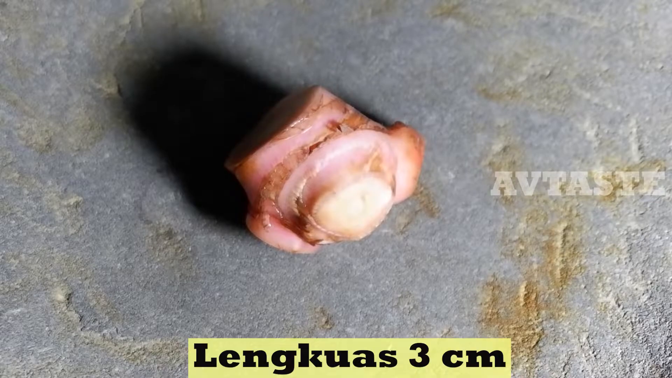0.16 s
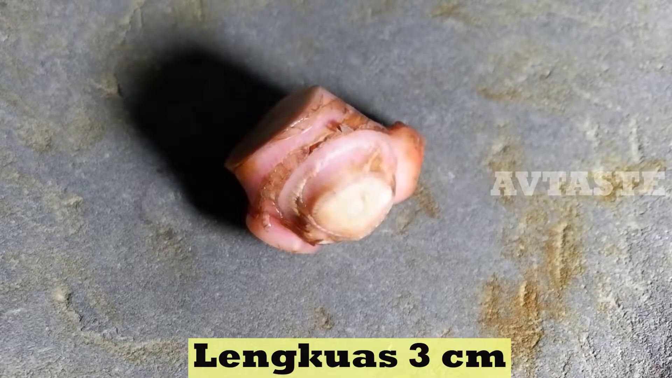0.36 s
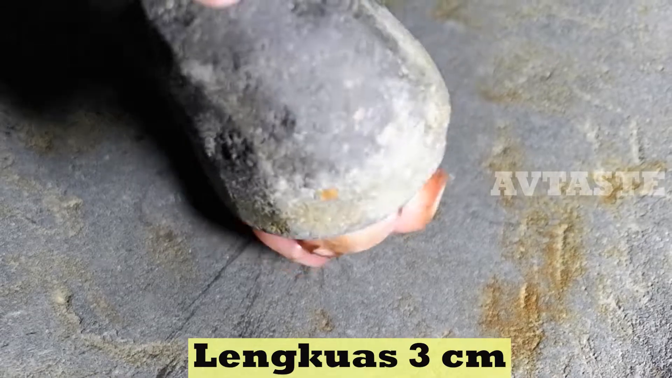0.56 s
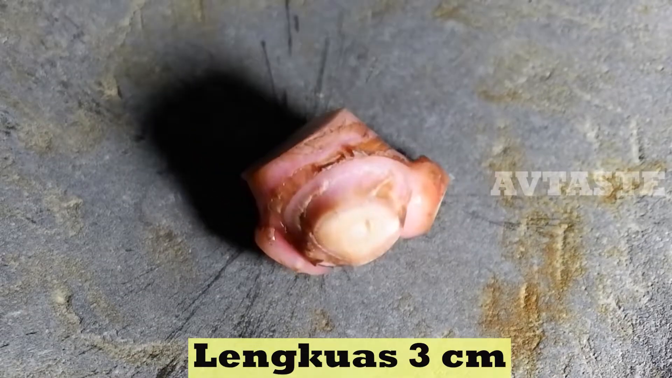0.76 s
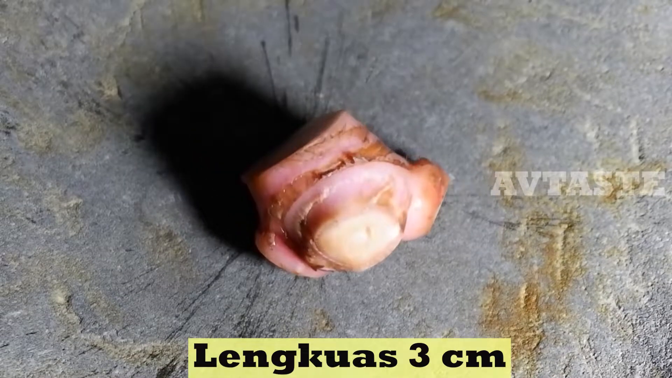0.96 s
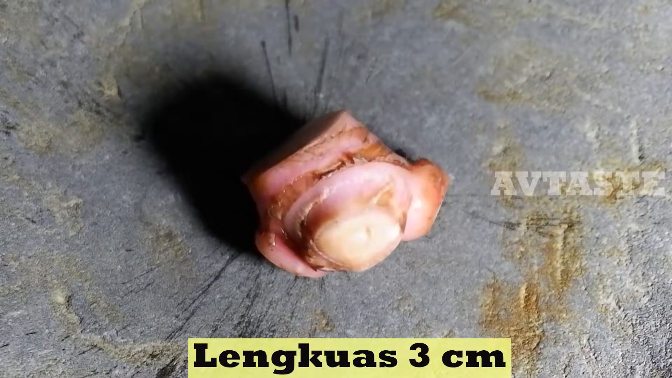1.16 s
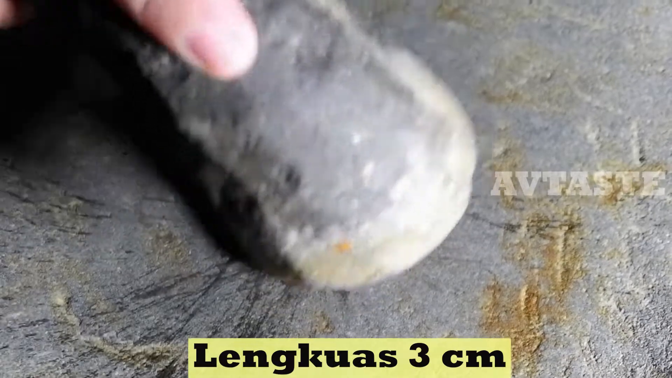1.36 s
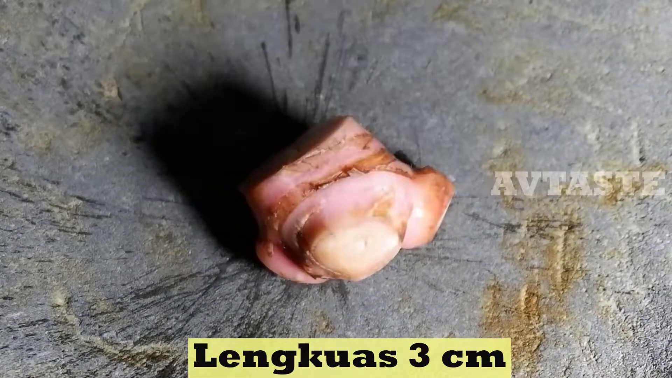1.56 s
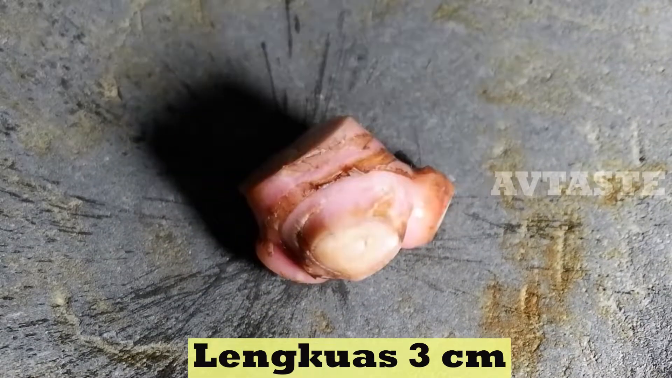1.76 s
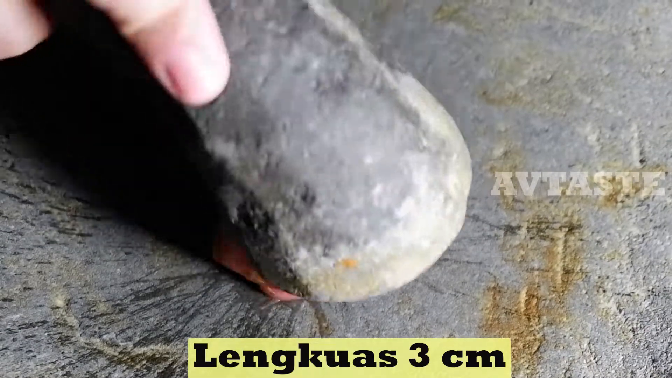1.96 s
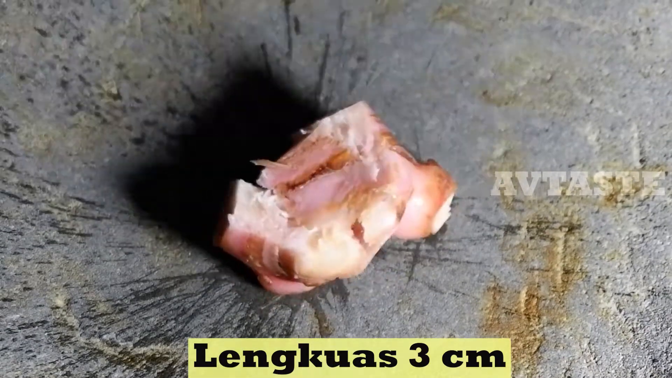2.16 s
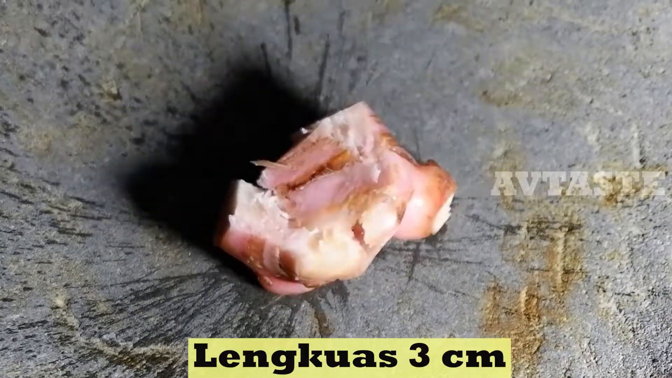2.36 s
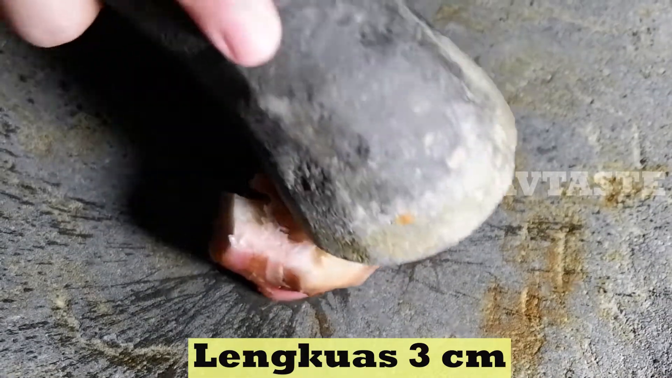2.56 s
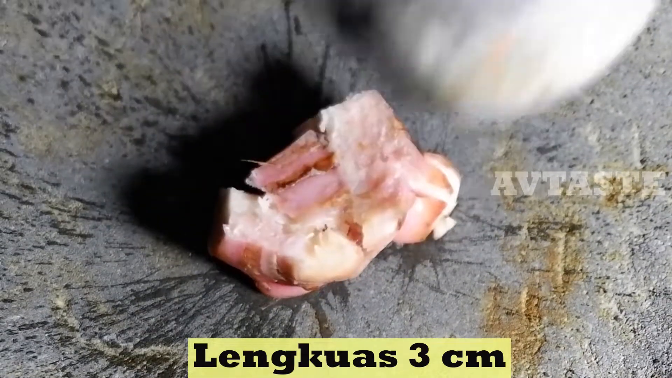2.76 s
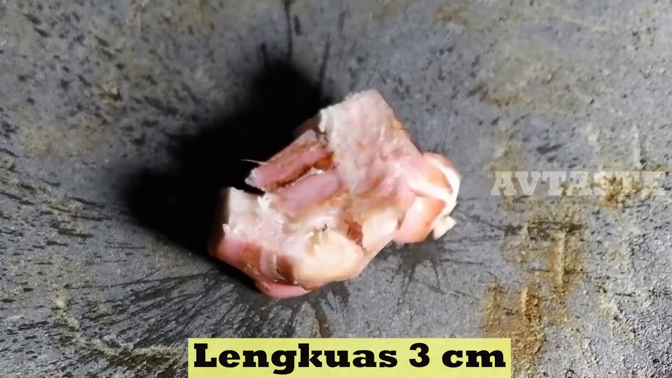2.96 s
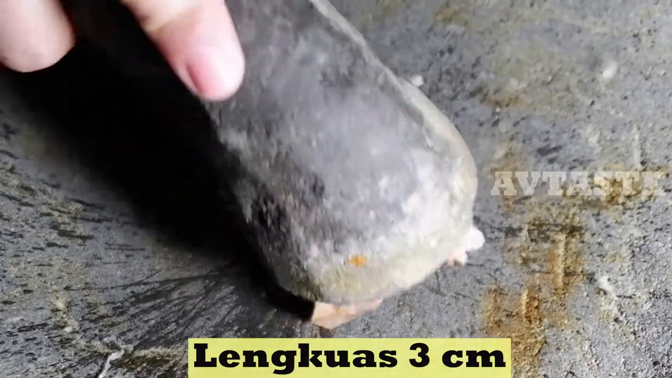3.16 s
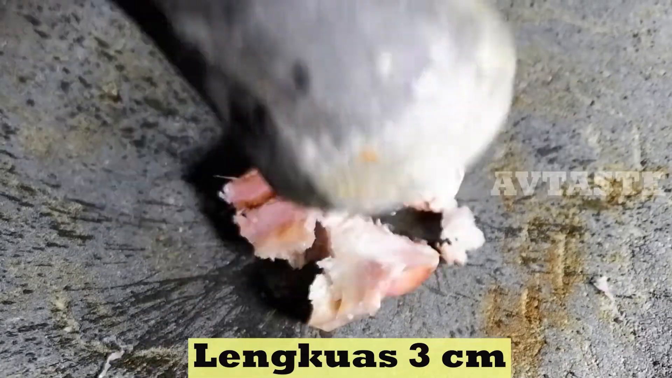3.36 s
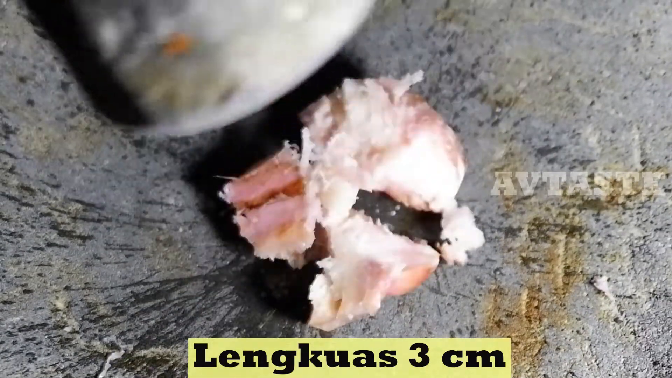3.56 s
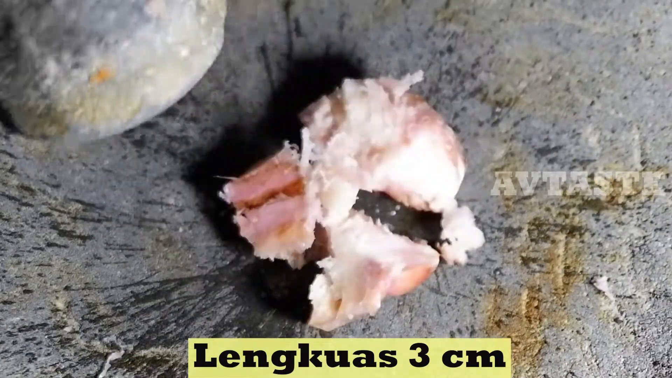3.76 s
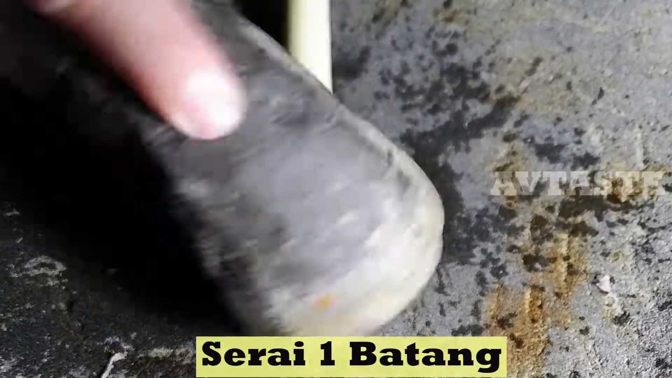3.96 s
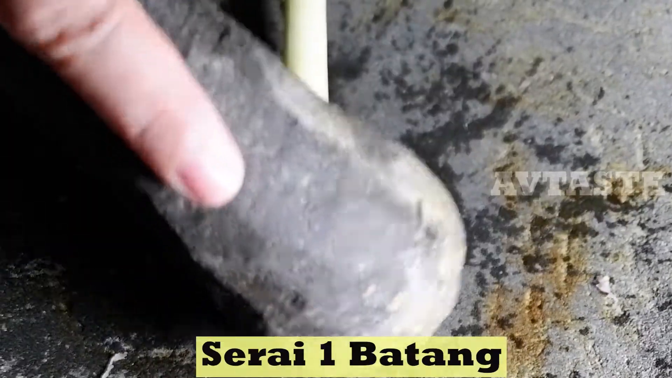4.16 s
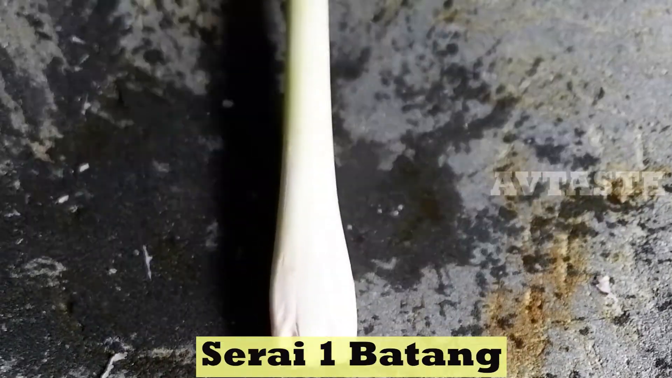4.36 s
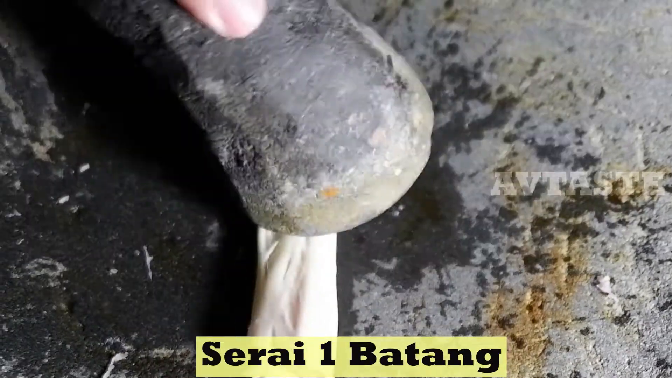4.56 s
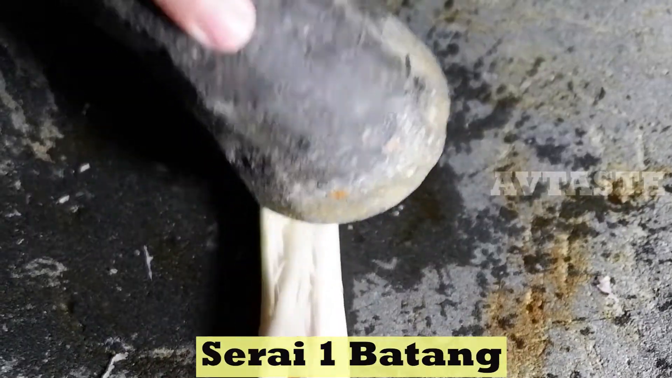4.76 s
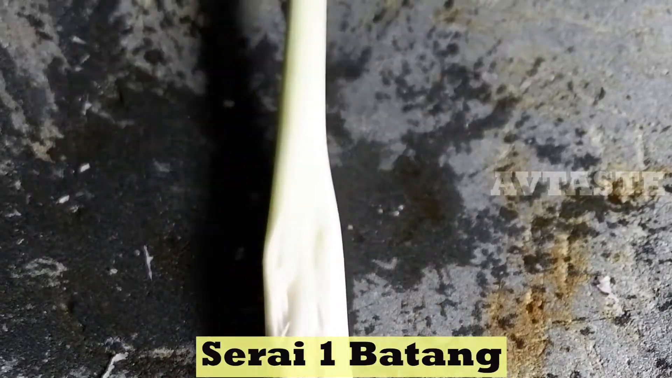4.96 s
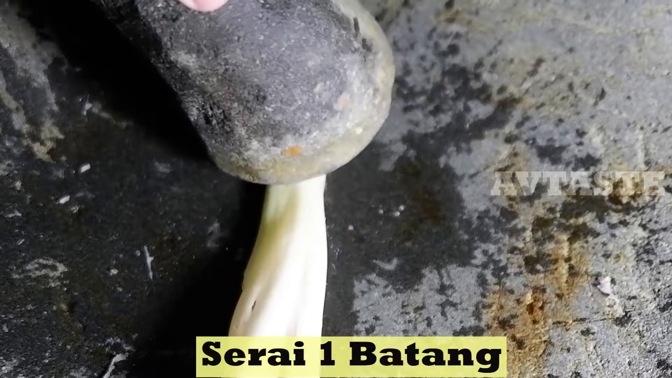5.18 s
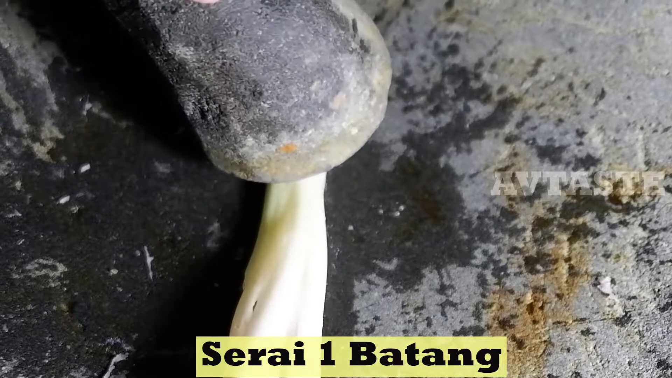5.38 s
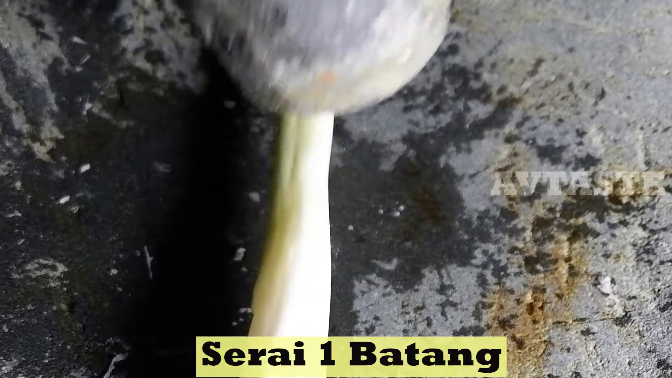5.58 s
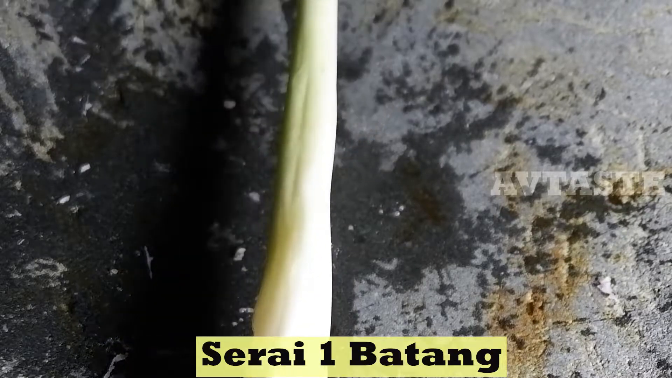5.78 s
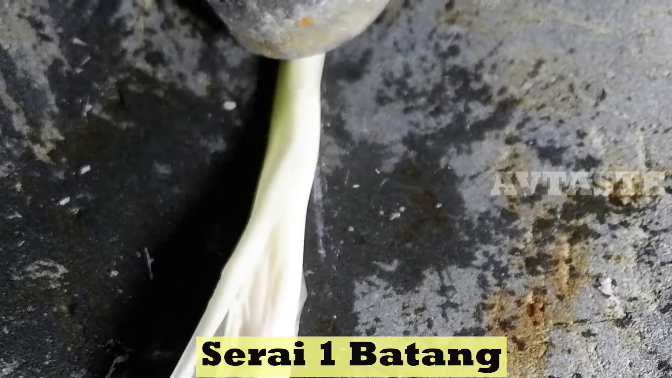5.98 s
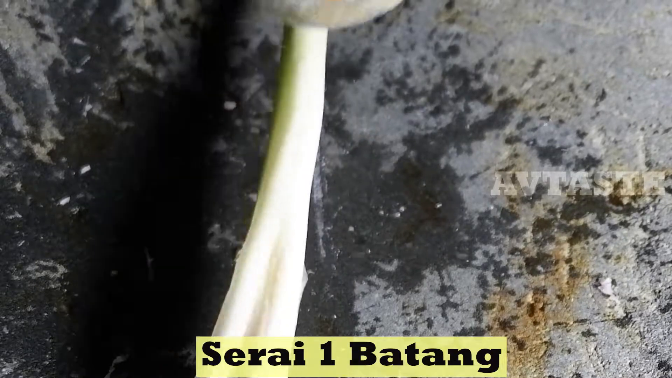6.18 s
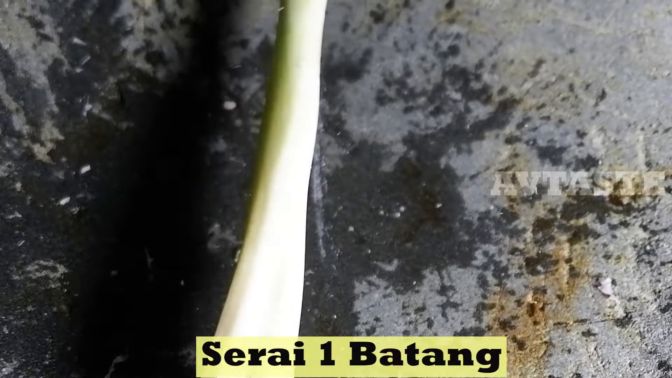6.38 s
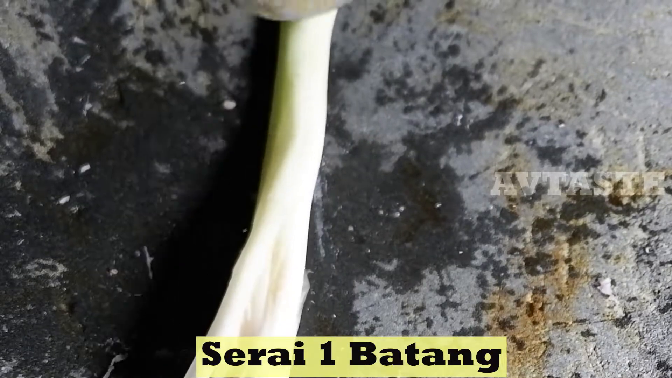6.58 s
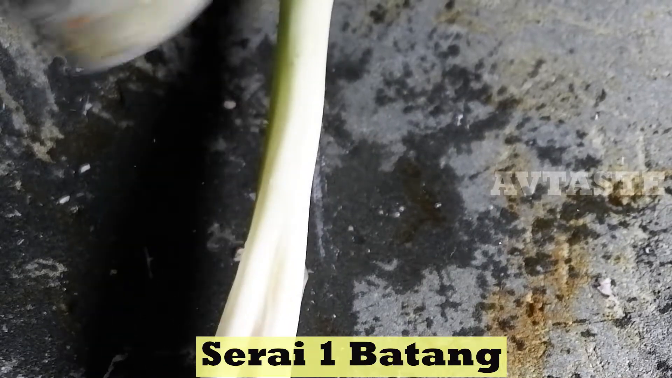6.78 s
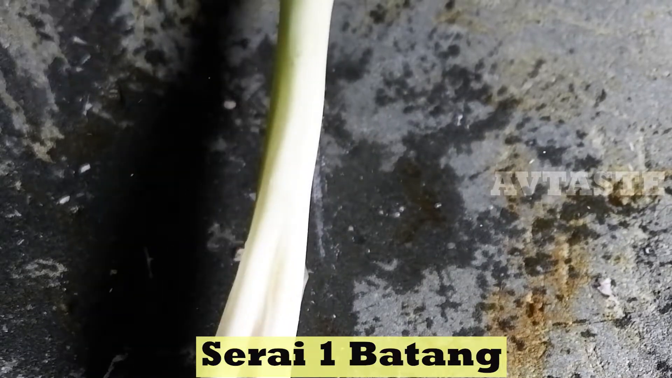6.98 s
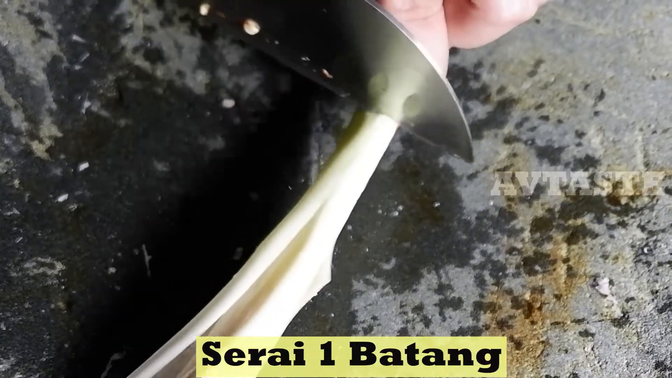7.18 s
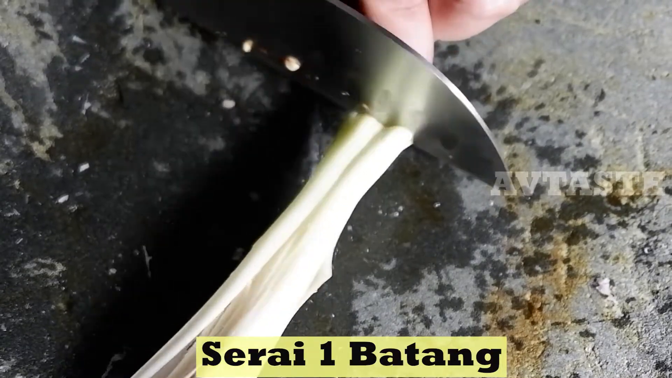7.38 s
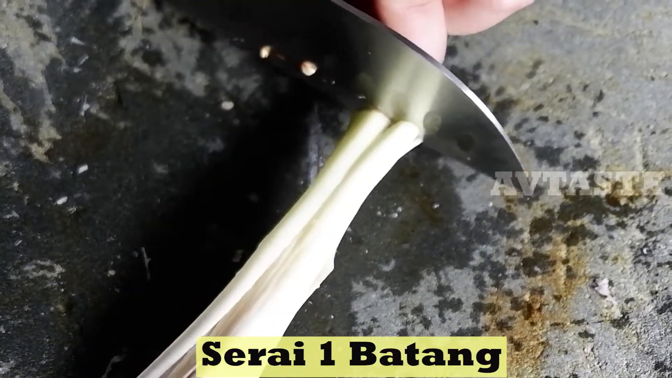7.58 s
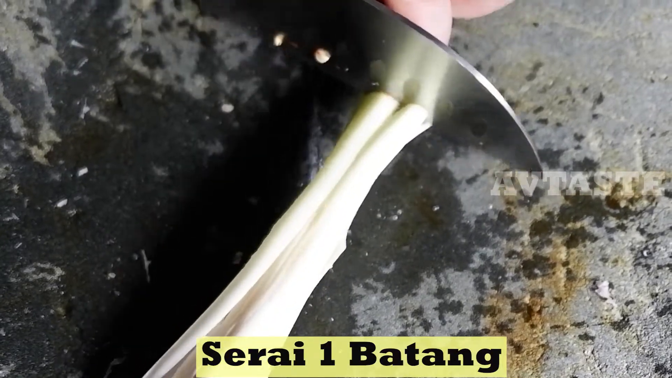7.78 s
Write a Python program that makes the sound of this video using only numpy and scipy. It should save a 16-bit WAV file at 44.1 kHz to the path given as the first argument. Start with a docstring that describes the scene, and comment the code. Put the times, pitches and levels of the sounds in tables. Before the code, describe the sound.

A heavy stone pestle smashes a fibrous root and then a stalk on a stone slab, booming in a hard kitchen, before crunchy knife slicing.

```python
"""A hard-walled kitchen: a stone pestle crushes a knob of galangal, then a lemongrass stalk, on a stone slab.
Each blow is a burst of splitting fibres (shaped noise), a deep thump (force pulse) that makes the room boom,
and knocks as the slab hops and settles (damped tones with grit).
The pounding then cuts to a knife slicing the stalk: crunching noise with single snaps.
Loud sound overloads the close microphone and ducks its limiter."""
import sys
import numpy as np
from scipy import signal
from scipy.fft import rfft, irfft
from scipy.io import wavfile
from scipy.ndimage import uniform_filter1d

SR = 44100
rng = np.random.default_rng(int(sys.argv[2]) if len(sys.argv) > 2 else 0)


def waveform_to_disk(signal):
    """Save audio, clipped to [-1, 1], as 16-bit WAV at the path in sys.argv[1]."""
    frames = np.transpose(np.atleast_2d(signal))
    scaled = np.clip(frames, -1, 1) * 32767
    samples = np.round(scaled).astype(np.int16)
    wavfile.write(sys.argv[1], SR, samples)


N = 345303

# pestle bottoming out; levels relative: (time [s], thump [dB], contact half-width [s], knock [dB],
# first hop of the slab [s], first landing [dB])
BLOWS = [(0.5547, 7.5, 0.00098, 1, 0.031, 7), (1.304, 9.5, 0.001, -1, .0272, 7),
         (1.936, 3.5, 0.0011, -4.5, 0.02, 0.5), (2.5642, 0.5, 0.0013, -9, 0.019, -4),
         (3.1821, 2.5, 0.001, -6, 0.015, -3), (4.0658, 1.5, 0.0011, 0, 0.012, -3.5),
         (4.6437, -1, 0.0012, -7.5, 0.013, -5.5), (5.2055, -3, 0.0012, -6.5, 0.0097, -16),
         (6.0203, 8.5, 0.00085, 7, .0147, -2), (6.581, 0.5, 0.00096, -9, 0.014, -3.5)]
ABSORPTION_DB_PER_S = 16.5   # damping shared by booms and reverberation, on top of each t60


def from_db(db):
    """Decibels to gain."""
    return 10 ** (np.asarray(db) / 20)


def rms_one(x):
    """Scale to rms 1."""
    return x / np.sqrt(np.mean(x ** 2) + 1e-20)


def at_hz(table, hz, axis=1):
    """Read one column of a table on a log-frequency axis."""
    table = np.array(table)
    return np.interp(np.log(np.maximum(hz, 1)), np.log(table[:, 0]), table[:, axis])


def add(track, time_s, sound):
    """Mix a sound in at a time."""
    start = round(time_s * SR)
    track[start:start + len(sound)] += sound[:N - start]


def coloured(x, spectrum):
    """Impose a spectrum with a causal, minimum-phase filter built from the folded cepstrum."""
    size = 4096
    gain = from_db(at_hz(spectrum, np.fft.rfftfreq(size, 1 / SR)))
    cepstrum = irfft(np.log(gain))
    cepstrum[1:size // 2] *= 2
    cepstrum[size // 2 + 1:] = 0
    impulse_response = irfft(np.exp(rfft(cepstrum)))
    return signal.oaconvolve(x, impulse_response)[:len(x)]


def resonance(x, hz, width_hz):
    """Two-pole resonance with a gain of about 1 on top."""
    radius = np.exp(-np.pi * width_hz / SR)
    zeros = np.array([1, 0, -1]) * (1 - radius * radius) / 2
    poles = [1, -2 * radius * np.cos(2 * np.pi * hz / SR), radius * radius]
    return signal.lfilter(zeros, poles, x)


def low_pass(x, edge_hz):
    """Second-order low-pass."""
    return signal.sosfilt(signal.butter(2, edge_hz, fs=SR, output="sos"), x)


def grains(count, spread_db):
    """Dense tiny fractures of very uneven size."""
    size_db = spread_db * np.clip(rng.standard_normal(count), -2, 2)
    return rng.standard_normal(count) * from_db(size_db)


def even_burst(envelope, spread_db):
    """Fractures under an envelope, their energy spread fairly evenly over all pitches."""
    spectrum = rfft(grains(len(envelope), spread_db) * envelope ** .75)
    flat = irfft(spectrum / (np.abs(spectrum) + 1e-12) ** .7, len(envelope))
    return flat * np.sqrt(envelope)


def background(left_db=2):
    """Low room tone, identical at both ears, with a faint hiss in opposite phase."""
    # spectra: (frequency [Hz], level [dB])
    tone_spectrum = [(15, -61), (25, -14), (38, -12), (102, -5), (134, 0.5), (695, -12.5), (936, -13.5),
                     (2690, -23), (4370, -18), (16000, -29.5)]
    hiss_spectrum = [(25, -38), (100, 4), (400, 1), (1000, -4.5), (2800, -8), (4300, -5.5), (8000, -10),
                     (16000, -14.5)]
    tone = from_db(-49) * rms_one(coloured(rng.standard_normal(N), tone_spectrum))
    hiss = from_db(-52) * rms_one(coloured(rng.standard_normal(N), hiss_spectrum))
    return (tone + hiss * [[1], [-1]]) * from_db([[left_db], [0]])


def kitchen(x, early_db=3, early_s=0.035, build_s=0.0023, side_db=-19):
    """Diffuse reverberation, dense at first and dying band by band; nearly the same at both ears."""
    # (frequency [Hz], level [dB], t60 before shared absorption [s])
    reverb = [(47.7, -2.5, 2.7), (94, 7, 1.2), (183, 4, 2.6), (381, 12.5, 0.88), (574, -1.5, 1.12),
              (800, -5.5, 0.72), (1700, -2.5, 1.01), (2930, -6, 1.1), (3500, -2, 0.95), (4860, -8, 0.89),
              (8800, -0.5, 0.72), (16000, -2, 0.36)]
    t = np.arange(3 * SR // 2) / SR
    white = rng.standard_normal((2, 2, len(t)))   # alternating noises for neighbouring bands
    shape = (1 - np.exp(-(t / build_s) ** 2)) * (1 + from_db(early_db) * np.exp(-t / early_s))
    edges_hz = 35 * 2 ** (np.arange(19) / 2)
    response = 0
    for k, (low_hz, high_hz) in enumerate(zip(edges_hz, edges_hz[1:])):
        centre_hz = np.sqrt(low_hz * high_hz)
        band_filter = signal.butter(2, [low_hz, high_hz], "band", fs=SR, output="sos")
        decay_db = -60 * t / at_hz(reverb, centre_hz, axis=2) - ABSORPTION_DB_PER_S * t
        band = signal.sosfilt(band_filter, white[k % 2]) * shape * from_db(decay_db)
        share = 2 * (high_hz - low_hz) / SR   # of white-noise energy
        scale = np.sqrt(share / np.sum(band ** 2, axis=1, keepdims=True))
        response = response + from_db(at_hz(reverb, centre_hz)) * band * scale
    mid, side = (signal.oaconvolve(x, r)[:N] for r in response)
    return mid + from_db(side_db) * side * [[1], [-1]]


def boom(thump, build_s=0.0094, echo_db=-3, modes_db=-33.5):
    """The thump bounces between the walls and builds up the room's standing waves."""
    # standing waves: (frequency [Hz], relative level [dB], t60 before shared absorption [s])
    room_modes = [(56, -35, 1.0), (68, -35, .8), (90, -35, 1.2), (128.5, -23.5, 1.7), (138, -34, 1.3),
                  (158, -23, 1.6), (166, -32, 1.2), (182, -28, 1.8), (186.5, -24, 1.7), (196, -28, 1.7),
                  (205.5, -26, 1.5), (219, -30, 1.2), (227, -27, 1.4), (247, -35, 1.2), (263.5, -26, 1.3),
                  (277, -32, .7), (300, -33, 1.1), (330, -31, .6), (385, -32, .7)]
    # wall and ceiling reflections: (delay [s], relative level [dB])
    echoes = [(.0053, -4), (0.0104, 0), (0.0173, 1), (0.0491, -7), (0.0637, -17)]
    t = np.arange(2 * SR) / SR
    waves = sum(from_db(db - 60 * t / t60) * np.cos(2 * np.pi * hz * t) for hz, db, t60 in room_modes)
    waves = waves * from_db(-ABSORPTION_DB_PER_S * t)
    response = from_db(modes_db) * waves * (1 - np.exp(-t / build_s))
    for delay_s, level_db in echoes:
        response[round(delay_s * SR)] += from_db(level_db + echo_db)
    return signal.oaconvolve(thump, response)[:N]


def knocks(contacts, t60_s, grit_db, width_hz, edge_hz):
    """A hard contact: one quickly damped tone, with grit rattling around the same pitch."""
    out, t = np.zeros(N), np.arange(SR // 8) / SR
    for time_s, level_db, hz in contacts:
        decay = from_db(-60 * t / t60_s)
        grit = resonance(even_burst(decay, 0), hz, width_hz)
        grit = from_db(grit_db) * grit / np.abs(grit).max()
        tone = resonance(np.sin(2 * np.pi * hz * t) * decay, hz, hz)
        add(out, time_s, from_db(level_db) * (tone + grit))
    return low_pass(out, edge_hz)


def bumps():
    """Dull bumps farther off in the kitchen: short, gritty, low-passed contacts."""
    # (time [s], relative level [dB], pitch [Hz])
    bump_table = [(3.316, -14, 427), (3.562, -6.5, 606), (3.691, -13, 697)]
    return knocks(bump_table, t60_s=0.014, grit_db=5.5, width_hz=420, edge_hz=570)


def slide(width_hz=780):
    """The wet stalk slips on the slab: soft, narrow hisses that swell and fade."""
    # (start [s], length [s], pitch [Hz], level [dB])
    slides = [(4.355, 0.75, 5600, -54), (5.05, 0.15, 4250, -41.5), (5.394, 0.45, 4900, -63)]
    out, t = np.zeros(N), np.arange(N) / SR
    for start_s, length_s, hz, level_db in slides:
        swell = np.sin(np.pi * np.clip((t - start_s) / length_s, 0, 1))
        hiss = resonance(resonance(rng.standard_normal(N), hz, width_hz), hz, width_hz)
        out += from_db(level_db) * swell * rms_one(hiss)
    return out


def blade_pressure(t, swell_db=1.5, release_db_per_s=178):
    """Pressure level [dB]: each stroke bites at once, swells until the blade is through and dies away."""
    # knife strokes: (start [s], time until the blade is through [s], relative level [dB])
    cuts = [(7.156, 0.082, -47.5), (7.323, 0.027, -40.5), (7.385, 0.075, -37.5), (7.782, 0.012, -44.5)]
    strokes = []
    for start_s, length_s, level_db in cuts:
        left_s = start_s + length_s - t
        shape_db = np.where(left_s > 0, -swell_db * left_s / length_s, release_db_per_s * left_s)
        strokes.append(np.where(t < start_s, -np.inf, level_db + shape_db))
    return np.max(strokes, axis=0)


def knife(snap_db=-5, snap_t60_s=0.012, crunch_db=-4, spread_db=8):
    """The blade parts fine fibres in a dense crunch; thicker ones snap one by one as decaying noise."""
    # thickest fibres snapping: (time [s], relative level [dB])
    snaps = [(7.158, -25), (7.1881, -20.5), (7.2524, -21), (7.3245, -17.5), (7.333, -26), (7.386, -21),
             (7.4205, -20), (7.4561, -17), (7.4913, -19.5), (7.5098, -30), (7.7822, -26)]
    # cutting spectrum: (frequency [Hz], level [dB])
    knife_colour = [(300, -42), (900, -6.5), (1600, 0.5), (3000, 1), (5500, 0), (7500, -11), (11000, -16.5),
                    (13000, -31), (16000, -15)]
    snaps_per_s, snap_over_pressure_db, snap_spread_db = 55, 17, 5   # thin fibres
    press_db = blade_pressure(np.arange(N) / SR)
    out = from_db(press_db + crunch_db) * rms_one(coloured(grains(N, spread_db), knife_colour))
    # thin fibres snap at random from the first stroke on, their level following the pressure
    thin = np.flatnonzero((rng.random(N) < snaps_per_s / SR) & np.isfinite(press_db))
    thin_db = press_db[thin] + snap_over_pressure_db + snap_spread_db * rng.standard_normal(len(thin))
    t = np.arange(SR // 50) / SR
    for time_s, level_db in [*snaps, *zip(thin / SR, thin_db)]:
        snap = coloured(rng.standard_normal(len(t)) * from_db(-60 * t / snap_t60_s), knife_colour)
        add(out, time_s, from_db(level_db + snap_db) * snap / np.abs(snap).max())
    return out


def stone(x, ring_db=0):
    """Contacts set the slab and pestle ringing briefly in their own modes."""
    # (frequency [Hz], width [Hz], relative level [dB])
    stone_modes = [(911, 6.7, -8), (1126, 3.2, -21.5), (1514, 18, -6), (1640, 10, -64), (2460, 450, -4.5),
                   (2980, 23, -3.5), (5300, 52, -49)]
    return x + sum(from_db(db + ring_db) * resonance(x, hz, width_hz) for hz, width_hz, db in stone_modes)


def clinks():
    """Stone meets stone through the flattened stalk: a high, nearly pure damped tone."""
    # (time [s], relative level [dB], pitch [Hz])
    clink_table = [(5.1975, -12, 2940)]
    return knocks(clink_table, t60_s=0.053, grit_db=-22, width_hz=200, edge_hz=4600)


def slab_contacts(count=3, slab_hz=896, pitch_spread=0.025, rebound=.42, rebound_loss_db=5):
    """The pestle knocks on the slab, which hops and lands in ever shorter, softer bounces."""
    for time_s, *_, knock_db, hop_s, landing_db in BLOWS:
        yield time_s, knock_db, slab_hz
        for k in range(count):
            time_s += hop_s * rebound ** k
            hz = slab_hz * np.exp(pitch_spread * rng.standard_normal())
            yield time_s, landing_db - k * rebound_loss_db, hz


def settling():
    """The slab's knocks and landings, coloured by the stone's ring."""
    contacts = knocks(slab_contacts(), t60_s=0.015, grit_db=0.5, width_hz=750, edge_hz=1540)
    return stone(contacts, ring_db=4.5)


def splits(skin_lead_s=.0068):
    """On its way down the pestle breaks the skin, then the flesh; yields the first six crack columns."""
    # flesh splitting; levels relative: (time [s], level [dB], base length [s], ring [Hz], ring [dB],
    # treble edge [Hz], preceding skin break [dB])
    crack_table = [(0.5467, 0.5, 0.0046, 746, 14, 4800, -46), (1.2959, 3, 0.006, 2200, -3, 5250, -31),
                   (1.9283, 2, 0.0065, 1360, -4, 5200, -54), (2.5568, 1.5, 0.0071, 4900, -6, 6860, -33),
                   (3.1715, 1, 0.0056, 3030, 2, 6700, -32), (4.0545, -2, 0.0072, 3050, -5, 7200, -49),
                   (4.631, -6.5, 0.0088, 2080, 1, 6900, -35), (5.195, -0.5, 0.0045, 2810, 5, 8100, -15),
                   (6.013, 0.5, 0.0057, 5500, -3, 7500, -18.5), (6.5694, -16, .013, 4320, 7, 7000, -31)]
    for time_s, *flesh, skin_db in crack_table:
        yield time_s - skin_lead_s, skin_db, .005, 1750, 4, 4900
        yield time_s, *flesh


def cracks(scatter_s, squelch_db, squelch_s, spread_db=3, ring_width_hz=300):
    """Milliseconds of fractures ring the stone, then a short wet squelch; scattering lengthens the burst."""
    # fracture spectrum: (frequency [Hz], level [dB])
    crack_colour = [(200, 1), (550, -1), (900, 6), (2000, 0.5), (3000, -0.5), (3700, -4.5), (5200, 0.5),
                    (7500, -9), (10000, -9), (12000, -14.5), (16000, 15)]
    out, t = np.zeros(N), np.arange(SR // 16) / SR
    for time_s, level_db, length_s, ring_hz, ring_db, edge_hz in splits():
        crush = np.sin(np.pi * np.minimum(t / (length_s + scatter_s), 1) ** 0.68)
        squelch = from_db(squelch_db) * np.exp(-t / squelch_s)
        burst = coloured(even_burst(np.abs(crush + squelch), spread_db), crack_colour)
        burst = low_pass(burst, edge_hz)
        burst = burst + from_db(ring_db) * resonance(burst, ring_hz, ring_width_hz)
        add(out, time_s, from_db(level_db) * rms_one(burst) * np.sqrt(length_s / t[-1]))
    return out


def thumps():
    """The slab radiates the curvature of a bell-shaped force pulse; a shorter contact sounds higher."""
    out, t = np.zeros(N), np.arange(-SR // 100, SR // 100) / SR
    for time_s, level_db, contact_s, *_ in BLOWS:
        u = t / contact_s
        add(out, time_s + t[0], from_db(level_db) * (u * u - 1) * np.exp(-u * u / 2))
    return out


def microphone(x, edge_hz=11800):
    """The left capsule is brighter; the response of both falls steeply in the high treble."""
    # (frequency [Hz], gain [dB])
    left_colour = [(1000, 0), (2600, -1.5), (5000, 3), (10000, 5), (14000, 15)]
    pair = np.array([coloured(x[0], left_colour), x[1]])
    return signal.sosfilt(signal.butter(10, edge_hz, fs=SR, output="sos"), pair + 1e-18)


def limiter(x, limit_db=-6, window_s=0.0036, recovery_db_per_s=18.5):
    """Loud sound pushes the gain down at once; it creeps back at a steady rate, and the hiss with it."""
    size = max(round(window_s * SR), 1)
    recovered_db = recovery_db_per_s * np.arange(N) / SR
    power = uniform_filter1d(np.mean(x ** 2, axis=0), size)
    level_db = 10 * np.log10(np.maximum(power, 1e-12))
    excess_db = np.maximum(level_db - limit_db, 0)
    cut_db = np.maximum.accumulate(excess_db + recovered_db) - recovered_db
    return x * from_db(-uniform_filter1d(cut_db, size // 2 + 1))


def scene(pounding_end_s=7.05, fade_s=0.007):
    """Pounding with its room sound, faded out quickly, then slicing, over a steady background."""
    thump, settle, clink, bump = thumps(), settling(), clinks(), bumps()
    crack = stone(cracks(scatter_s=0, squelch_db=-11.5, squelch_s=0.0047))
    close = thump + from_db(2) * settle + from_db(8) * clink + crack
    # the cracks reach the room smeared by the hand, the pestle and nearby things
    scattered = stone(cracks(scatter_s=0.0046, squelch_db=-23, squelch_s=0.043))
    room_feed = from_db(-7) * thump + from_db(-4) * scattered + from_db(3.5) * settle
    room_feed = room_feed + from_db(-5) * clink + bump
    room = boom(thump) + kitchen(room_feed)
    pounding = close + from_db(-8.5) * bump + slide() + room
    fade = np.clip((pounding_end_s - np.arange(N) / SR) / fade_s, 0, 1)
    cut = knife()
    slicing = cut + from_db(0.5) * kitchen(cut)
    return microphone(pounding * fade + slicing) + background()


def record(dry, ceiling=0.85, left_db=-3, low_cut_hz=46, top_cut_hz=16000):
    """Cut rumble, limit, flatten peaks softly against the ceiling, weaken the left side, cut the top."""
    low_cut = signal.butter(2, low_cut_hz, "high", fs=SR, output="sos")
    limited = limiter(signal.sosfilt(low_cut, dry))
    clipped = limited / (1 + (limited / ceiling) ** 6) ** (1 / 6)
    top_cut = signal.ellip(10, .1, 70, top_cut_hz, fs=SR, output="sos")
    return signal.sosfilt(top_cut, clipped * from_db([[left_db], [0]]))


dry = scene()
out = record(dry)
waveform_to_disk(out)
```